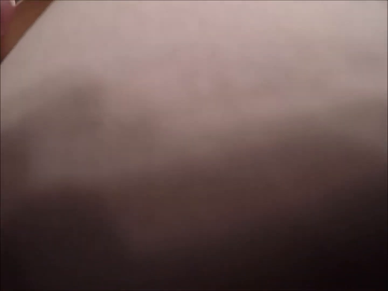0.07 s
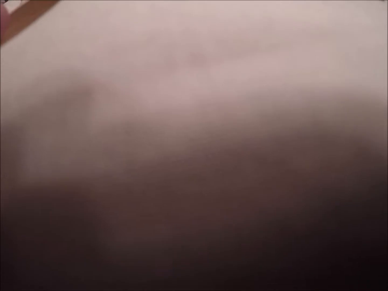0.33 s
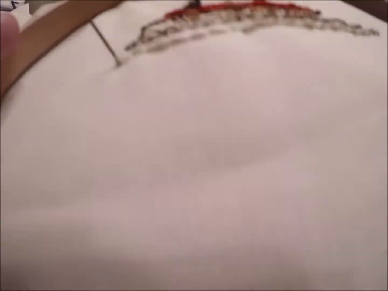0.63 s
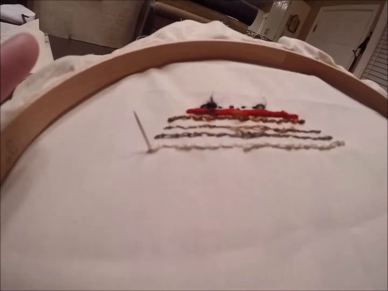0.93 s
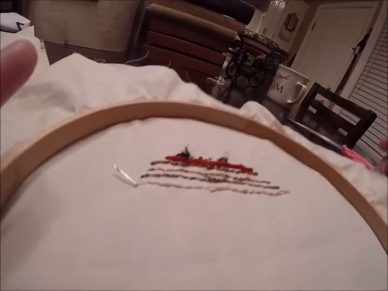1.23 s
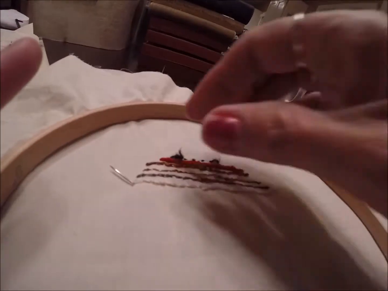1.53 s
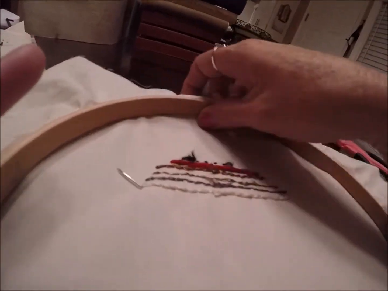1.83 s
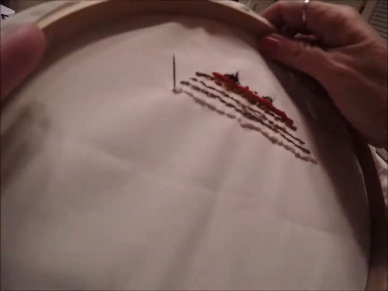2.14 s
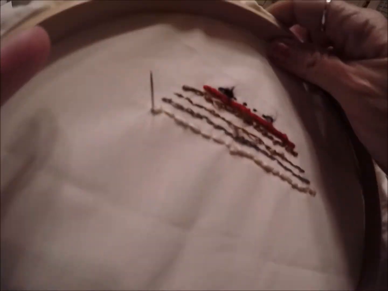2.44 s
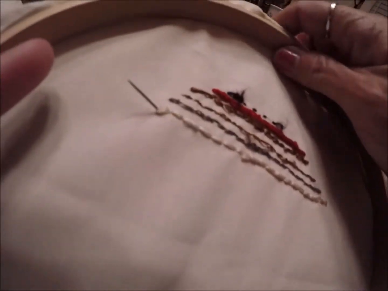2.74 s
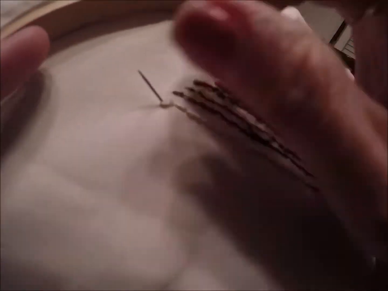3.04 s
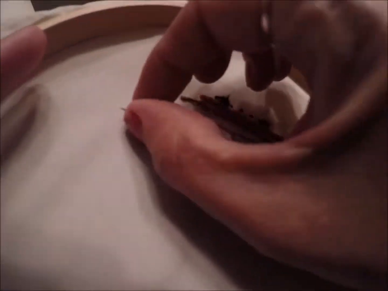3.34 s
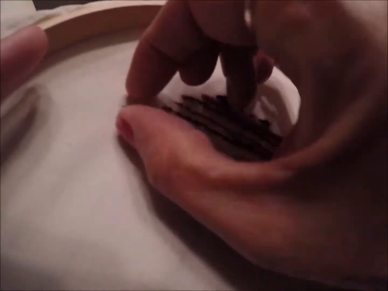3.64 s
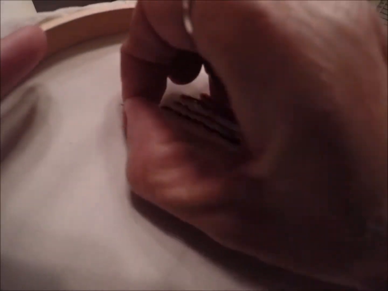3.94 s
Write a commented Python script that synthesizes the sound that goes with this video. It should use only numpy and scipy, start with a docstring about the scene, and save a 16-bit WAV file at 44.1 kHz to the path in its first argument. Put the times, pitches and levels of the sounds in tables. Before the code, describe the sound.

A wooden embroidery hoop knocks as it is handled close up in a small, quiet room. Cloth rubs over the microphone for the first half second. Two loud, hollow knocks ring briefly at about 1.2 and 2.3 seconds, with softer taps, thuds and low rumble around them. Fingers drag on the taut fabric with a low flutter from 2.5 to 3 seconds. A fingernail clicks sharply on the needle around 3.6.

```python
"""Handling an embroidery hoop

A wooden hoop with taut cloth is handled right at a camera in a small, quiet room. Cloth first rubs
over the microphone; then knocks, two of them loud, excite the modes of wood and cloth, and the room
reverberates. Hands rumble, tap and slide on the frame, fingers brush the fabric and judder on it by
stick-slip friction, and a fingernail scratches the weave and clicks on the needle."""
import sys
import numpy as np
from scipy import signal
from scipy.fft import rfft, irfft, next_fast_len
from scipy.io import wavfile
from scipy.ndimage import map_coordinates

SR = 44100
rng = np.random.default_rng(int(sys.argv[2]) if len(sys.argv) > 2 else 0)


def pcm_store(signal):
    """Save signal as 16-bit PCM."""
    levels = np.round(np.clip(np.atleast_2d(signal), -1, 1) * 32767)
    wavfile.write(sys.argv[1], SR, levels.astype(np.int16).T)


N = 176400


def amp(db):
    """Amplitude ratio of a level in decibels."""
    return 10 ** (np.asarray(db) / 20)


def unit(x):
    """Normalisation to rms 1."""
    return x / np.sqrt(np.mean(x ** 2) + 1e-20)


def along(points, hz):
    """Interpolation of (frequency, value) points on a logarithmic axis."""
    f, v = np.transpose(points)
    return np.interp(np.log(hz + 1), np.log(f + 1), v)


def curve(rows):
    """Linear interpolation of (time, value) points at every sample."""
    return np.interp(np.arange(N) / SR, *np.transpose(rows))


def pan(db):
    """Stereo gains for a level difference, left minus right."""
    return amp(np.array([[.5], [-.5]]) * db)


def rise(t, time_constant):
    """Exponential onset from 0 towards 1."""
    return 1 - np.exp(-t / time_constant)


def wobble(rate):
    """Smooth random modulation with rate knots a second."""
    knots = rng.standard_normal(int(N * rate / SR) + 4)
    return map_coordinates(knots, [np.arange(N) * rate / SR])


def filtered(x, response):
    """Zero-phase filtering by a frequency response."""
    n = x.shape[-1]
    m = next_fast_len(n + SR // 10)
    return irfft(rfft(x, m) * response(np.fft.rfftfreq(m, 1 / SR)), m)[..., :n]


def causal(x, gain, size=4096):
    """Minimum-phase filtering: nothing rings ahead of the attack."""
    cepstrum = irfft(np.log(gain(np.fft.rfftfreq(size, 1 / SR)) + 1e-6))
    cepstrum[1:size // 2] *= 2
    cepstrum[size // 2 + 1:] = 0
    impulse_response = irfft(np.exp(rfft(cepstrum)))
    return signal.fftconvolve(x, impulse_response[None], axes=1)[:, :x.shape[1]]


def add(out, s, x):
    """Superposition of x on out from time s."""
    part = out[:, max(0, round(s * SR)):][:, :x.shape[-1]]
    part += x[..., :part.shape[1]]


def noise(colour, correlation=((1000, 0),)):
    """Coloured noise of rms 1; the ratio of mid to side sets the left-right correlation."""
    def response(hz):
        angle = np.arccos(np.clip(along(correlation, hz), -1, 1)) / 2
        return amp(along(colour, hz)) * [np.cos(angle), np.sin(angle)]
    mid, side = filtered(rng.standard_normal((2, N)), response)
    return unit(np.array([mid + side, mid - side]))


def ring(modes, t, spread, blur=0.0):
    """Sum of damped modes; phases differ by channel (spread, rad) and diffuse (blur, rad per root s)."""
    out = np.zeros((2, len(t)))
    for hz, db, t60 in modes:
        envelope = amp(db + rng.normal(0, 1) - 60 * t / t60)
        drift = blur * np.cumsum(rng.standard_normal(len(t))) / np.sqrt(SR) if blur else 0
        shift = np.array([[1], [-1]]) * spread * (2 * rng.random() - 1)
        out += envelope * np.sin(2 * np.pi * hz * t + drift + shift)
    return out


# Pressure of cloth on the microphone (time [s], level [dB])
RUB_PRESS = [(0, -48), (.076, -39), (.148, -39.5), (.3, -46.5), (.345, -41), (.39, -30), (.425, -32),
             (.443, -47), (.467, -40.5), (.502, -30.5), (.545, -39), (.555, -55.5)]
# Spectrum of the rubbing (frequency [Hz], level [dB])
RUB_SPECTRUM = [(40, -18), (150, 15), (300, 10.5), (450, 10.5), (650, 5.5), (1300, 0), (1650, -10),
                (2000, 2.5), (2200, -5.5), (2650, -3), (3050, -11.5), (3600, -19), (7000, -24),
                (10000, -31.5), (14000, -48)]
# Likeness of the two microphone ports (frequency [Hz], correlation [-1 to 1])
RUB_CORRELATION = [(60, -0.55), (200, -0.36), (550, -0.83), (1300, -0.68), (2200, 0.32), (5000, 0.027)]
# Balance of the ports (frequency [Hz], left-right [dB])
RUB_PAN = [(60, 1), (180, 10.5), (540, 3.5), (1620, 2.5), (4860, -2.5), (14600, -13)]
def rub(gain_db=12, release_s=0.096, reference_db=-41, murk_follow=0.55, split_hz=900, grain_db=2.4):
    """Friction at the microphone ports: pressure raises the rasp more than the murk; the cloth lifts."""
    lift = np.exp(-np.maximum(np.arange(N) / SR - RUB_PRESS[-1][0], 0) / release_s)
    cloth = unit(filtered(noise(RUB_SPECTRUM, RUB_CORRELATION), lambda hz: pan(along(RUB_PAN, hz))))
    murk = filtered(cloth, lambda hz: 1 / (1 + (hz / split_hz) ** 4))
    press_db = curve(RUB_PRESS) - reference_db
    rasp = (cloth - murk) * amp(press_db + grain_db * wobble(400))
    return amp(gain_db + reference_db) * lift * (rasp + murk * amp(murk_follow * press_db))


# Fingers brushing the fabric (time [s], level [dB])
BRUSH_ENVELOPE = [(0, -54), (.55, -50), (.84, -54), (.96, -55.5), (.99, -66), (1.1, -55.5), (1.2, -56.5),
                  (1.35, -72), (1.68, -66), (1.77, -54.5), (1.84, -44), (1.865, -61), (1.92, -56.5),
                  (1.945, -56), (1.97, -51.5), (2.04, -45.5), (2.09, -49), (2.14, -50), (2.17, -61.5),
                  (2.29, -49.5), (2.4, -52), (2.48, -54), (2.57, -53.5), (2.66, -58), (2.82, -50.5),
                  (2.93, -49.5), (2.955, -65), (3.18, -60.5), (3.27, -52), (3.34, -58.5), (3.5, -60),
                  (3.68, -53.5), (3.73, -63.5), (3.9, -62.5), (4, -57)]
# Position of the brushing (time [s], left-right [dB])
BRUSH_PAN = [(.5, -3), (.95, -6.5), (1.8, 0.5), (2.3, -1.5), (2.9, -0.5), (3.3, 3.5), (4, 1)]
# Spectrum of the brushing (frequency [Hz], level [dB])
BRUSH_SPECTRUM = [(300, 8), (1200, 1.5), (2000, -2), (2800, -2), (4700, -6.5), (6100, 1.5), (7500, -1.5),
                  (8400, -9), (10000, -10.5), (12000, -31), (15000, -27)]
def brush(gain_db=5.5, grain_db=1.1, flutter_db=1.2):
    """Sliding friction of skin on fabric: a fine hiss, made grainy by amplitude modulation."""
    hiss = noise(BRUSH_SPECTRUM, correlation=[(500, 0.082), (6000, 0.15)])
    weave = unit(hiss * amp(grain_db * wobble(970) + flutter_db * wobble(40.26)))
    return amp(gain_db + curve(BRUSH_ENVELOPE)) * pan(curve(BRUSH_PAN)) * weave


# Rumble of the grip (time [s], level [dB])
GRIP_ENVELOPE = [(0, -40), (.3, -37), (.45, -29), (.8, -28), (1.1, -29.5), (1.38, -29.5), (1.5, -28),
                 (1.62, -30.5), (1.72, -27.5), (2.1, -28), (2.28, -29.5), (2.55, -29), (3.02, -28),
                 (3.15, -29.5), (3.45, -31), (3.57, -35), (3.7, -29), (3.9, -34.5), (4, -33)]
# Spectrum of the rumble (frequency [Hz], level [dB])
GRIP_SPECTRUM = [(15, -0.5), (30, 4.5), (48, -3.5), (72, 1), (110, -6.5), (170, -15), (300, -21.5),
                 (450, -31.5), (800, -48.5), (2000, -51.5), (6000, -88)]
# Likeness of left and right (frequency [Hz], correlation [-1 to 1])
GRIP_CORRELATION = [(30, 0.67), (80, 0.52), (300, 0.92), (1000, 0.033)]
def grip(gain_db=1.5, tremor_db=3.0):
    """Structure-borne sound: the holding hands send a continuous rumble into the camera."""
    rumble = noise(GRIP_SPECTRUM, GRIP_CORRELATION) * amp(tremor_db * wobble(24.92))
    return amp(gain_db + curve(GRIP_ENVELOPE)) * unit(rumble)


# Still room and hiss (frequency [Hz], level [dB])
AIR_SPECTRUM = [(180, -17), (300, -11), (726, -23.5), (1290, -22), (1540, -26.5), (1790, -27.5),
                (5010, -38.5), (7300, -35), (11900, -40), (15000, -41)]
def air(level_db=-50.5):
    """Noise floor: stationary noise, uncorrelated between the channels."""
    return amp(level_db) * noise(AIR_SPECTRUM)


# Soft pushes of the hands, and the frame settling after a knock (time [s], level [dB], frequency [Hz], left-
# right [dB])
FRAME_BUMPS = [(0.398, -12, 69.5, 16), (0.613, -23, 47, 17), (0.814, -13.5, 51.3, 2),
               (0.882, -17.5, 55.5, 5), (1.696, -15.5, 66, 3.5), (1.854, -11.5, 69, 6),
               (2.092, -12, 55.5, 4), (2.162, -17, 48.5, 6), (2.358, -26, 97, 5), (2.903, -12.5, 52, -1),
               (3.037, -8.5, 67, 2), (3.312, -9.5, 61.6, -5.5), (3.637, -16.5, 81, 3)]
def bumps(gain_db=1.5, rise_s=0.0037, t60=0.091):
    """Damped oscillation: the pushed or settling frame swings for a few low cycles."""
    out, t = np.zeros((2, N)), np.arange(SR // 2) / SR
    for s, db, hz, side_db in FRAME_BUMPS:
        envelope = amp(db + gain_db - 60 * t / t60) * rise(t, rise_s)
        add(out, s, pan(side_db) * envelope * np.sin(2 * np.pi * hz * t))
    return out


# Nail strokes (time [s], duration [s], level [dB], left-right [dB], filter peak [Hz])
NAIL_STROKES = [(0.82, 0.0028, -34.5, 1, 4900), (0.831, 0.004, -36, 1, 5200),
                (1.017, 0.021, -44.5, -7, 9070), (1.036, 0.05, -45.5, 2, 5240), (2, 0.076, -46.5, 0, 5930),
                (2.11, .025, -48, -10, 7500), (2.195, 0.13, -55, -4, 7500), (2.875, 0.07, -51, 0, 6700),
                (3.289, 0.031, -40.5, 4, 7100), (3.571, 0.023, -39, 8, 5000)]
# Spectrum of nail on weave (frequency [Hz], level [dB])
SCRATCH_SPECTRUM = [(1000, -3), (3000, -13), (4100, 5), (5000, -3), (6200, 3.5), (7700, 3), (9500, -13),
                    (13000, -35)]
def scratches(grain_db=4, skirt_db_per_octave=11, rise_s=0.001):
    """Roughness noise: the nail catches thread after thread in short, bright bursts."""
    out = np.zeros((2, N))
    threads = noise(SCRATCH_SPECTRUM) * amp(grain_db * wobble(700))
    for s, length, db, side_db, peak_hz in NAIL_STROKES:
        n = round(length * SR)
        focus = lambda hz: amp(-skirt_db_per_octave * np.abs(np.log2((hz + 1) / peak_hz)))
        stroke = unit(filtered(threads[:, round(s * SR):][:, :n], focus))
        envelope = np.minimum(1, np.arange(n) / (rise_s * SR)) * np.sqrt(np.linspace(1, 0, n))
        add(out, s, amp(db) * pan(side_db) * stroke * envelope)
    return out


# Reverberation time of the room (frequency [Hz], t60 [s])
ROOM_T60 = [(100, 0.26), (500, 0.38), (1500, 0.53), (3000, 0.46), (10000, 0.43)]
def room_tail(t, build_s):
    """Diffuse field: noise that builds up, then decays band by band; mean energy 1 per channel."""
    hz, s, spectra = signal.stft(rng.standard_normal((2, len(t))), SR, nperseg=256)
    decay = amp(-60 * s / along(ROOM_T60, hz)[:, None])
    tail = signal.istft(spectra * decay, SR, nperseg=256)[1][:, :len(t)]
    return unit(tail * rise(t, build_s)) / np.sqrt(len(t))


def reverberate(x, tail):
    """Convolution with the room's impulse response."""
    return signal.fftconvolve(x, tail, axes=1)[:, :x.shape[1]]


# Nail striking needle (time [s], level [dB], left-right [dB], gain of modes under 3 kHz [dB])
NEEDLE_CLICKS = [(0.8205, -27, -7, -12), (1.0207, -26, 0, -16), (1.204, -35, -11, -12),
                 (1.2642, -37, -3, 5), (1.939, -33, 1, 4), (2.3588, -42, -6, 4), (2.5022, -20, -2, 5.5),
                 (3.288, -33, 16, -15), (3.292, -45, 15, -20), (3.557, -11, 0, 3), (3.5648, -17, 18, -7),
                 (3.5701, -16.5, 3, 1)]
# Modes of a click (frequency [Hz], level [dB], t60 [s])
NEEDLE_MODES = [(1150, -12.5, 0.014), (2345, -8.5, 0.015), (3830, -8, 0.0083), (5940, -2.5, 0.014),
                (6730, 1.5, 0.0051), (7480, -10, 0.01), (11380, -22.5, 0.015), (12500, -27.5, .012)]
def clicks(crack_db=-6, crack_t60=0.0081, rise_s=0.0011, room_db=1, room_fade_s=0.14):
    """Impact excitation: the needle's modes ring briefly, with a crack and a shortened room tail."""
    out, t = np.zeros((2, N)), np.arange(SR // 2) / SR
    for s, db, side_db, low_db in NEEDLE_CLICKS:
        modes = [(hz, level + low_db * (hz < 3000), t60) for hz, level, t60 in NEEDLE_MODES]
        crack = amp(crack_db - 60 * t / crack_t60) * noise(BRUSH_SPECTRUM)[:, :len(t)]
        click = (ring(modes, t, spread=1.0, blur=30) + crack) * rise(t, rise_s)
        room = reverberate(click, room_tail(t, build_s=0.00083) * amp(-60 * t / room_fade_s))
        add(out, s, amp(db) * (pan(side_db) * click + amp(room_db) * room))
    return out


# Knocks of the hoop (time [s], blow [dB], low-pass corner [Hz], thump [dB], ring [dB], room [dB],
# body [dB], crack [dB], damping by the hand [dB/s], left-right [dB])
HOOP_KNOCKS = [(1.0399, -19.5, 2150, -25, -42.5, -34, -34, -30, 90, -1),
               (1.2339, -2, 4000, -14, -21, -6, -16.5, -15.5, 17, -1),
               (2.3312, -2.5, 1600, -14, -30.5, -11.5, -15.5, -14.5, 28, -1)]
# Modes of the wood before the hand's damping (frequency [Hz], level [dB], t60 [s])
HOOP_MODES = [(366, -21, 0.22), (483, -3.5, 0.15), (491, 1.5, 0.4), (533, 3.5, 0.12), (667, -10, 0.5),
              (802.6, -0.5, 0.19), (905, -1.5, 0.23), (1036, -7, 0.26), (1116, -3, 0.35), (1167, -6, 0.7),
              (1280, -5, 0.3), (1307, -7, 0.28), (1380, -1.5, 0.28), (1535, -16, 0.58), (1610, -35, 0.41),
              (1910, -16, 0.46), (2650, -26, 0.49)]
# Hollow, quickly damped modes of the frame (frequency [Hz], level [dB], t60 [s])
BODY_MODES = [(245, -29, 0.046), (362, 3.5, 0.017), (392, -3, 0.057), (632, -11.5, 0.12), (810, -10, 0.059),
              (900, 2.5, 0.056), (1250, -4.5, 0.085)]
# Membrane modes of the taut cloth (frequency [Hz], level [dB], t60 [s])
CLOTH_MODES = [(66, 1.5, 0.18), (108.2, -0.5, 0.24), (125.7, -1, 0.21), (159.3, -2, 0.16)]
# Spectrum of the blow (frequency [Hz], level [dB])
BLOW_SPECTRUM = [(30, -35), (150, -5), (300, -21), (500, 14.5), (680, -4.5), (900, -5), (1300, 2),
                 (2000, -5), (2600, 0.5), (3200, -8.5), (5000, -15.5), (6600, -10), (9000, -13),
                 (14000, -29)]
# Spectrum of its bright edge (frequency [Hz], level [dB])
CRACK_SPECTRUM = [(800, -26), (2100, -25), (2550, 6), (3200, 1), (3800, 9), (4900, 0), (6600, 18),
                  (7500, -2), (8800, -18), (14000, -21)]
# Spectrum of the room's answer (frequency [Hz], level [dB])
ANSWER_SPECTRUM = [(100, -7), (300, 0.5), (400, 4), (510, 0), (670, -5), (850, 5), (1020, -4.5), (1300, 0),
                   (1600, -7), (2600, -10.5), (3400, -21), (5000, -22), (7000, -18), (13000, -49)]
def knocks(blow_gain_db=16, scatter_db=-22, scatter_t60=0.035, crack_t60=0.009, answer_gain_db=27,
           crack_rise_s=0.0017, wood_rise_s=0.00088, thump_rise_s=0.0034):
    """Modal response to an impulse: a blow cracks, the wood rings, the cloth thumps, the room answers."""
    out, t = np.zeros((2, N)), np.arange(SR) / SR
    for s, db, corner_hz, thump_db, ring_db, room_db, body_db, crack_db, damping, side_db in HOOP_KNOCKS:
        soft = lambda hz: 1 / np.sqrt(1 + (hz / corner_hz) ** 4)
        softened = lambda x, spectrum: causal(x, lambda hz: soft(hz) * amp(along(spectrum, hz)))
        scatter = amp(scatter_db - 60 * t / scatter_t60) * rng.standard_normal((2, len(t)))
        blow = amp(db + blow_gain_db) * softened((t == 0) + scatter, BLOW_SPECTRUM)
        crack_envelope = amp(crack_db - 60 * t / crack_t60) * rise(t, crack_rise_s)
        crack = crack_envelope * noise(CRACK_SPECTRUM)[:, :len(t)]
        hoop = amp(ring_db - damping * t) * ring(HOOP_MODES, t, spread=1.5, blur=8.1)
        body = amp(body_db) * ring(BODY_MODES, t, spread=1.0, blur=24)
        wood = causal(rise(t, wood_rise_s) * (hoop + body), soft)
        thump = amp(thump_db) * rise(t, thump_rise_s) * ring(CLOTH_MODES, t, spread=0.37)
        room = amp(room_db + answer_gain_db) * softened(room_tail(t, build_s=0.015), ANSWER_SPECTRUM)
        add(out, s, pan(side_db) * (blow + crack + wood + thump + room))
    return out


# Fingertip on the rim (time [s], level [dB], frequency [Hz], left-right [dB])
RIM_TAPS = [(1.0412, -19, 490, 0), (1.746, -25.5, 403, -8), (1.938, -28.5, 1090, 2), (1.962, -21, 900, -9),
            (2.008, -14.5, 615, 3), (2.0277, -16.5, 990, -8), (2.03, -14, 410, -13), (2.3587, -7, 420, -4),
            (2.484, -12.5, 584, -6), (2.487, -16.5, 1130, 0)]
def taps(gain=2, rise_cycles=0.4, decay_cycles=3.12, thud_db=-8, room_db=0.5):
    """Contact damping: a fingertip stops the wood within a few cycles, over a thud an octave below."""
    out, t = np.zeros((2, N)), np.arange(SR // 2) / SR
    for s, db, hz, side_db in RIM_TAPS:
        t60 = decay_cycles / hz
        tap = ring([(hz, 0, t60), (hz / 2, thud_db, t60)], t, spread=0.82) * rise(t, rise_cycles / hz)
        room = reverberate(tap, room_tail(t, build_s=0.014))
        add(out, s, gain * amp(db) * (pan(side_db) * tap + amp(room_db) * room))
    return out


# A hand taking hold (time [s], level [dB], frequency [Hz], t60 [s], left-right [dB])
PALM_GRABS = [(1.7274, -18.5, 245, 0.052, -1), (2.029, -6.5, 171, 0.032, 0), (3.68, -26.5, 205.4, 0.097, 5)]
def grabs(rise_cycles=0.43, room_db=-9):
    """Soft impact: the palm meets the rim and excites one deep, quickly damped mode."""
    out, t = np.zeros((2, N)), np.arange(SR // 2) / SR
    for s, db, hz, t60, side_db in PALM_GRABS:
        thud = ring([(hz, 0, t60)], t, spread=0.22) * rise(t, rise_cycles / hz)
        room = reverberate(thud, room_tail(t, build_s=0.01))
        add(out, s, amp(db) * (pan(side_db) * thud + amp(room_db) * room))
    return out


# Hand strokes (start [s], peak [s], end [s], level [dB], resonance [Hz], resonance gain [dB])
RIM_SLIDES = [(1.778, 1.837, 1.92, -38.5, 787, 2.5), (1.803, 1.88, 2.3, -60.5, 810, 3),
              (1.923, 2.057, 2.26, -44.5, 900, -2), (2.98, 3.087, 3.3, -47.5, 652, -1.5),
              (3.263, 3.297, 3.57, -46.5, 1390, -11), (3.55, 3.582, 3.61, -36.5, 1150, -12),
              (3.597, 3.655, 3.72, -46, 252, 3), (3.947, 3.994, 4.02, -44, 403, -11)]
# Spectrum of skin on wood (frequency [Hz], level [dB])
SLIDE_SPECTRUM = [(100, -11.5), (350, -0.5), (640, -6.5), (900, -11), (1300, -10), (2000, -20.5),
                  (4000, -16.5), (8000, -59)]
def slides(grain_db=1.8, half_width_hz=42):
    """Friction-driven resonance: each shift of the hand on the rim swells and fades with a hollow tone."""
    friction, out = noise(SLIDE_SPECTRUM), np.zeros((2, N))
    for start, peak, end, db, centre_hz, hollow_db in RIM_SLIDES:
        hollow = unit(filtered(friction, lambda hz: 1 / (1 + ((hz - centre_hz) / half_width_hz) ** 2)))
        swell = curve([(start, 0), (peak, 1), (end, 0)]) ** 1.9
        out += amp(db) * swell * (friction + amp(hollow_db) * hollow)
    return out * amp(grain_db * wobble(150))


# Finger dragging on cloth (time [s], duration [s], level [dB], slip rate [Hz], left-right [dB])
FINGER_DRAGS = [(2.455, 0.075, -25.5, 78, 2), (2.587, 0.096, -25.5, 73, 1.5),
                (2.717, 0.17, -23.5, 70, -1.5), (2.924, 0.072, -20.5, 62, 3), (2.993, 0.042, -23.5, 89, 2)]
def judders(rate_jitter=0.059, octave_db=-8):
    """Stick-slip oscillation: skin catches and lets go unevenly, shaking the cloth in a low flutter."""
    out = np.zeros((2, N))
    for s, length, db, slip_hz, side_db in FINGER_DRAGS:
        n = round(length * SR)
        phase = 2 * np.pi * np.cumsum(slip_hz * (1 + rate_jitter * wobble(45)[:n])) / SR
        flutter = np.sin(phase) + amp(octave_db) * np.sin(2 * phase)
        add(out, s, amp(db) * pan(side_db) * signal.windows.tukey(n, .5) * flutter)
    return out


def scene():
    """Superposition of all handling sounds on the still room."""
    impacts = knocks() + taps() + grabs() + bumps()
    fingerwork = judders() + clicks() + scratches()
    friction = rub() + brush() + slides()
    return impacts + fingerwork + friction + grip() + air()


def record(dry, corner_hz=12900, limit_hz=15200):
    """Band limiting: the camera's top octave rolls off, and nothing passes its limit."""
    return filtered(dry, lambda hz: (hz < limit_hz) / np.sqrt(1 + (hz / corner_hz) ** 20))


dry = scene()
out = record(dry)
pcm_store(out)
```